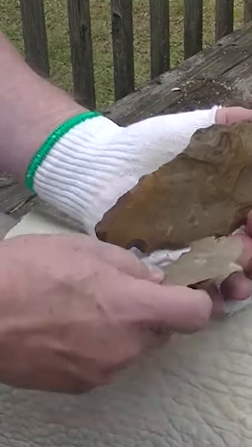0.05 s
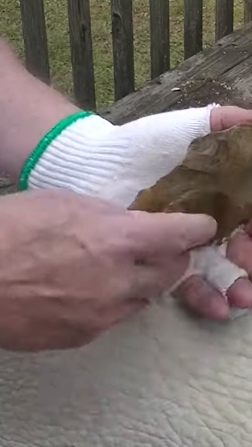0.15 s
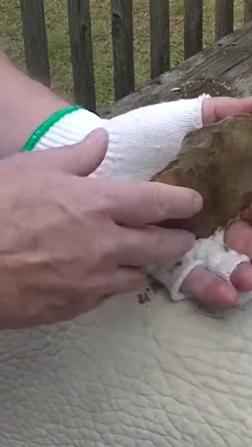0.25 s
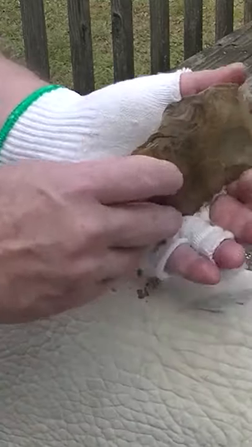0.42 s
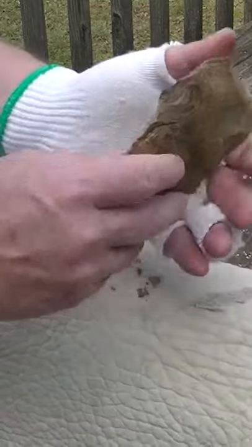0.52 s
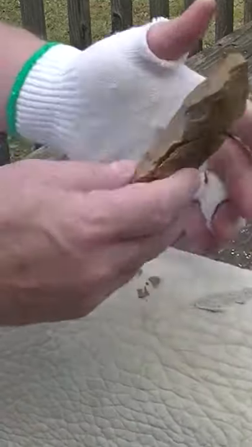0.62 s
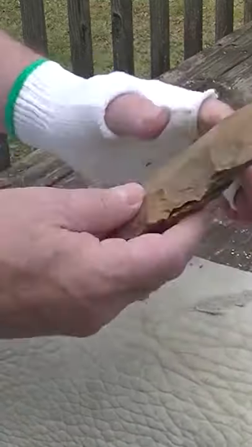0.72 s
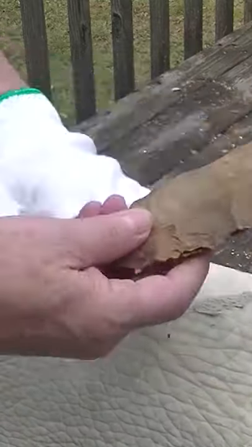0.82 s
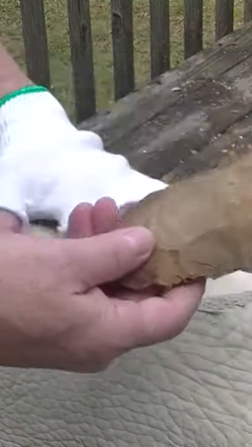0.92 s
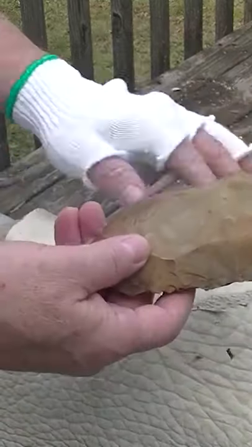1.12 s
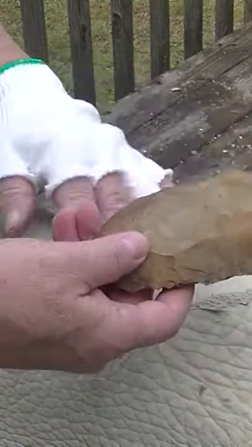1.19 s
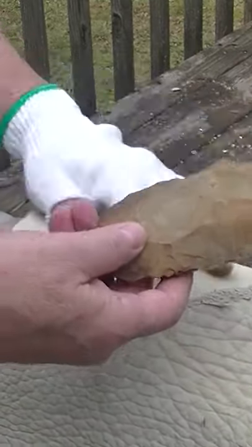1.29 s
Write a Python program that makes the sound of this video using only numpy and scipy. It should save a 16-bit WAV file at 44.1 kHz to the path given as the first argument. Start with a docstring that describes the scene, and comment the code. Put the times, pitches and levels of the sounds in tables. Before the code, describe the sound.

A thin flint flake clinks against a larger stone from about 0.2 seconds, close up: a quick cluster of sharp, ringing clicks with a gritty scrape, loudest near 0.3 and fading by 0.6. From 0.9 to 1.2 seconds fingers and a cotton glove softly rub the stone, and a small chip tinks near 1.25. Quiet garden air continues throughout, with a thin, distant bird call around 0.9.

```python
"""Flint on stone in a garden

Close to a stereo pair of microphones, outdoors, a thin flint flake is knocked against a larger stone
and dragged over it: each contact clicks and sets the flake ringing. Fingers and a cotton glove then rub
over the stone as it is turned, and a small chip tinks. Deck boards and a fence answer faintly.
Far off, birds call thinly over quiet garden air."""
import sys
import numpy as np
from scipy import signal
from scipy.fft import rfft, irfft, next_fast_len
from scipy.io import wavfile
from scipy.ndimage import uniform_filter1d, minimum_filter1d, map_coordinates

SR = 44100
rng = np.random.default_rng(int(sys.argv[2]) if len(sys.argv) > 2 else 0)


def dump(signal):
    """Clip the signal to [-1, 1] and save it as 16-bit WAV at the path in sys.argv[1]."""
    limited = np.clip(np.atleast_2d(signal).T, -1, 1)
    pcm = np.round(limited * 32767).astype(np.int16)
    wavfile.write(sys.argv[1], SR, pcm)


N = 59535

# the flake's modes: (frequency [Hz], level [dB], t60 [s], left minus right [dB])
FLAKE_MODES = [(4863, -12.5, .08, 2), (8125, -8, 0.081, 4.5), (9016, 1, 0.046, -6.5),
               (10920, -20.5, 0.046, 8), (12570, -28, .05, 15), (13400, -15.5, .055, -0.5)]


def flake_knocks():
    """Each knock clicks and rings the flake; hard ones have a sharp edge. Gives (clicks, rings + edges)."""
    # stone contacts, mostly the flake meeting the stone; the last, at 1.278 s, is the small chip bouncing once
    # more: (time [s], click [dB], pitch [Hz], width [cycles], ring [dB], sharp edge [dB])
    knocks = [(.2371, -4, 2640, 0.27, -20.5, -12), (.25, -26, 2440, 0.55, -42, -55),
              (0.2555, -16, 2670, 0.42, -46, -55), (.258, -15.5, 2650, 0.34, -34, -52),
              (0.275, -20, 2720, 0.39, -33.5, -53), (0.2823, -25.5, 2740, 0.53, -59, -60),
              (.2865, -25, 2430, 0.39, -28.5, -29), (0.3026, -23.5, 2890, 0.61, -35.5, -55),
              (0.3142, 3.5, 4720, 0.97, -13, -6.5), (.3148, -5.5, 2504, .6, -28.5, -36),
              (0.3298, -12, 3850, 0.34, -32, -40), (.357, -2.5, 3450, 0.41, -25, -18),
              (0.3695, -16.5, 2970, 1.15, -44, -50), (0.3768, -18.5, 3460, 0.41, -52, -55),
              (0.3904, -15.5, 3020, 0.9, -42, -45), (.4065, -13, 3550, 0.4, -33, -35),
              (0.4083, -7.5, 3880, 0.36, -36, -26), (.412, -6, 3156, 1.1, -51, -28),
              (.456, -23, 2920, 0.61, -64, -70), (0.4671, -29.5, 2750, 0.51, -55, -65),
              (0.5189, -25.5, 2530, 0.45, -70, -75), (0.5579, -27.5, 2670, 0.23, -70, -50),
              (0.984, -26, 3320, 1.7, -70, -70), (1.278, -35, 3000, 0.46, -75, -65)]
    # spectrum of the sharp edge: (frequency [Hz], gain [dB])
    edge_colour = [(60, -18), (500, -4.5), (1400, -13.5), (6000, -3), (9000, 4.5), (13500, -1.5),
                   (16000, -8)]
    edge_decay_s, nudge_s = 0.00018, 0.9845
    clicks, edges, rings = np.zeros(N), np.zeros(N), np.zeros((2, N))
    t = np.arange(SR // 200) / SR
    for s, db, hz, cycles, ring_db, edge_db in knocks:
        add(clicks, s, amp(db) * click(hz, cycles))
        add(edges, s, amp(edge_db) * rng.standard_normal(len(t)) * np.exp(-t / edge_decay_s))
        add(rings, s, amp(ring_db) * ring(FLAKE_MODES, shimmer=0.21))
    # a soft push rings only the lowest mode
    add(rings, nudge_s, amp(-23.5) * ring(FLAKE_MODES[:1], shimmer=0.12))
    return clicks, rings + coloured(edges, edge_colour)


def flake_drag():
    """The edge sticks and slips, crushing grit and keeping the modes singing. Gives (slips, rings + rasp)."""
    # the stroke: (time [s], level [dB], slip pitch [Hz], lowest mode [dB], upper modes [dB])
    stroke = [(.236, -53, 2550, -80, -70), (.239, -32.5, 2530, -54, -41), (.262, -33.5, 2530, -58, -41),
              (.29, -49.5, 2540, -60, -50), (.312, -53, 2920, -52, -62), (.318, -26.5, 3330, -52, -39),
              (.34, -29, 3640, -31.5, -36), (.354, -34, 3100, -31.5, -47), (.38, -28, 3300, -31.5, -47.5),
              (.408, -26, 2970, -31.5, -40.5), (.42, -34, 3130, -41, -68), (.45, -57, 2900, -64, -75),
              (.463, -41, 2560, -66, -70), (.49, -66, 2540, -90, -88), (.56, -49, 2550, -88, -82),
              (.6, -66.5, 2600, -100, -100)]
    # spectrum of crushed grit: (frequency [Hz], gain [dB])
    rasp_colour = [(2500, -35), (6000, -6), (7400, -3), (8400, -14), (9500, 2), (10500, -3), (12000, -9),
                   (13400, -3), (15000, -26)]
    slips_per_s = 700
    level_db, pitch_hz, lowest_db, upper_db = curves(stroke)
    slips, rings = np.zeros(N), np.zeros((2, N))
    t = np.arange(N) / SR
    touching = (t > stroke[0][0]) & (t < stroke[-1][0])
    for k, (hz, db, t60, side_db) in enumerate(FLAKE_MODES):
        steady, mode_db = (4.5, lowest_db) if k == 0 else (1, upper_db + db)
        sway = steady + wobble(9 / t60) + 1j * wobble(9 / t60) + 1.02 * rattle(N)
        rings += amp(mode_db) * unit(mode_at_mics(sway * np.exp(2j * np.pi * hz * t), side_db))
    for k, (late, size, tune, push) in enumerate(rng.standard_normal((N // 30, 4))):
        s = abs(k + late / 2) / slips_per_s
        if s * SR < N - 1:
            hz = pitch_hz[int(s * SR)] * np.exp(0.15 * np.clip(tune, -2, 1))
            add(slips, s, np.sign(push) * amp(2 * min(size, 1)) * click(hz, cycles=0.57))
    rasp = amp(level_db - 16.5) * unit(coloured(slips * rng.standard_normal((2, N)), rasp_colour))
    return touching * amp(level_db) * unit(slips), touching * (rings + rasp)


def click(hz, cycles):
    """The pulse of one stone contact: a few swings under an envelope of peak 1."""
    t = np.arange(SR // 200) / SR
    rise = t * hz / cycles / 2
    return (rise * np.exp(1 - rise)) ** 2 * np.sin(2 * np.pi * hz * t)


def ring(modes, shimmer):
    """Free ringing of a struck piece, a little different at every blow."""
    t = np.arange(SR // 4) / SR
    attack = 1 - np.exp(-t / 0.00024)
    out = np.zeros((2, len(t)))
    for hz, db, t60, side_db in modes:
        envelope = attack * amp(db + rng.normal() - 60 * t / t60)
        mode = (1 + shimmer * rattle(len(t))) * np.exp(2j * np.pi * (hz * t + rng.random()))
        out += envelope * mode_at_mics(mode, side_db)
    return out


def rattle(count, swings_per_s=700):
    """The pressed stone rattles: quick random swings in the size and phase of a mode."""
    position = np.arange(count) * swings_per_s / SR
    knots = rng.standard_normal((2, N // 8))
    real, imag = [map_coordinates(row, [position], mode="wrap") for row in knots]
    return real + 1j * imag


def mode_at_mics(mode, side_db, apart_turns=0.1):
    """A mode reaches each microphone with its own level and phase."""
    return pan(side_db) * np.real(mode * np.exp(1j * np.pi * apart_turns * np.array([[1], [-1]])))


def contacts_at_mics(pulses):
    """Stone contacts, coloured, reach the microphones with a balance that depends on frequency."""
    # spectrum of stone on stone: (frequency [Hz], gain [dB])
    contact_colour = [(40, -27), (300, -10.5), (1150, -7), (1750, 0.5), (3300, -1.5), (4700, 0),
                      (6500, -0.5), (10000, 8), (14000, -22), (16000, -20)]
    # place in the stereo image: (frequency [Hz], left minus right [dB])
    balance = [(1000, -1), (2200, 0.5), (3200, -4.5), (4500, 1), (7000, -4), (9500, -5), (13000, 1)]
    hz, side_db = np.transpose(balance)
    gains = pan(1) ** np.interp(np.fft.rfftfreq(N, 1 / SR), hz, side_db)
    phase_shift = 1 + 1j * amp(-18.5) * np.array([[1], [-1]])
    return irfft(rfft(coloured(pulses, contact_colour)) * gains * phase_shift, N)


def chip():
    """A small chip lands and bounces with a crisp splash and a high, short ring."""
    # the landings: (time [s], level [dB])
    landings = [(1.2558, -27.5), (1.2583, -34), (1.2638, -39.5)]
    # the chip's modes: (frequency [Hz], level [dB], t60 [s], left minus right [dB])
    chip_modes = [(4660, 1, 0.027, -1), (5000, -5.5, .04, 3), (5280, -12, 0.054, 0), (7035, -6.5, 0.043, 3),
                  (8400, -16.5, 0.021, 12), (10980, -6.5, 0.034, -7.5), (12385, -6.5, 0.04, -8)]
    out = amp(-7) * grit(landings, decay_s=0.0045)
    for s, db in landings:
        add(out, s, amp(db) * ring(chip_modes, shimmer=0.33))
        add(out, s, amp(db - 1) * click(hz=4760, cycles=1))
    return out


def crumbs():
    """Crumbs of grit drop as the drag ends."""
    # the drops: (time [s], level [dB])
    drops = [(.5465, -47), (.5605, -40.5), (.622, -50.5)]
    return grit(drops, decay_s=0.0023)


def grit(hits, decay_s):
    """Grit ticks in short, bright bursts of noise."""
    # spectrum of a tick: (frequency [Hz], gain [dB])
    tick_colour = [(3000, -29), (7000, -8), (10000, 0), (13700, 0), (15500, -6)]
    out, t = np.zeros((2, N)), np.arange(SR // 20) / SR
    for s, db in hits:
        burst = rng.standard_normal((2, len(t)))
        add(out, s, amp(db) * (burst / 2 + burst.mean(0)) * np.exp(-t / decay_s))
    return coloured(out, tick_colour)


def fingers():
    """Skin rubs over the stone as it is turned."""
    # the strokes: (time [s], level [dB])
    strokes = [(.82, -80), (.88, -51.5), (.94, -64.5), (.975, -40.5), (1.012, -53), (1.036, -43.5),
               (1.08, -47.5), (1.108, -38.5), (1.165, -63.5), (1.331, -67.5), (1.338, -45.5)]
    # spectrum of skin on stone: (frequency [Hz], gain [dB])
    skin_colour = [(800, -38), (1700, -9.5), (2400, 1), (3400, -1.5), (4300, -10), (6500, -16.5),
                   (10000, -26), (15000, -32)]
    return rub(strokes, skin_colour)


def glove():
    """Cotton brushes the stone with a dry hiss."""
    # the strokes: (time [s], level [dB])
    strokes = [(.93, -78), (.975, -73), (1.01, -60), (1.04, -56.5), (1.068, -46), (1.085, -58), (1.12, -55),
               (1.17, -82)]
    # spectrum of cotton on stone: (frequency [Hz], gain [dB])
    cotton_colour = [(1500, -20), (4200, 8.5), (6500, 0.5), (10000, -5), (15000, -15)]
    return rub(strokes, cotton_colour)


def rub(strokes, colour, grain_db=3):
    """Skin or cotton catches on the rough stone in dense grains."""
    level_db, = curves(strokes)
    noise = rng.standard_normal((2, N))
    grains = (noise + 3 * noise.mean(0)) * amp(grain_db * wobble(700))
    return amp(level_db) * unit(coloured(grains, colour))


def bird_call():
    """One thin rising call in the distance, smeared by the trees."""
    start_s, length_s, rise_s = 0.883, 0.041, 0.015
    start_hz, top_hz, waver_hz = 6250, 7600, 130
    t = np.maximum(np.arange(N) / SR - start_s, 0)
    hz = top_hz + (start_hz - top_hz) * np.exp(-t / rise_s) + waver_hz * wobble(600)
    envelope = np.sin(np.pi * np.minimum(t / length_s, 1) ** 0.5)
    call = amp(-42) * envelope * np.sin(2 * np.pi * np.cumsum(hz) / SR)
    return call + amp(-1.5) * echo(call, t60=0.38)


def bird_whistle(waver_hz=130):
    """A fainter bird, far off, glides up and fades."""
    # the glide: (time [s], pitch [Hz], level [dB])
    glide = [(0, 7300, -62), (.05, 7450, -71), (.08, 7650, -76), (.14, 8000, -69), (.2, 8300, -81),
             (.25, 8300, -120)]
    hz, db = curves(glide)
    return amp(db) * np.sin(2 * np.pi * np.cumsum(hz + waver_hz * wobble(600)) / SR)


def garden_air():
    """Quiet outdoor background, nearly the same at both microphones."""
    # spectrum of the air: (frequency [Hz], gain [dB])
    air_colour = [(15, -40), (25, -30), (64, -5.5), (123, -11), (161, -1.5), (373, -3.5), (405, -2.5),
                  (503, -6.5), (1070, -7), (1160, -7), (3250, -14.5), (4140, -25.5), (4740, -22),
                  (7920, -27), (16000, -35)]
    # its slow drift: (time [s], level [dB])
    drift = [(0, -49.5), (.2, -50.5), (.75, -49.5), (1.35, -49)]
    # its stereo width: (frequency [Hz], side gain [dB])
    width = [(50, -17.5), (1000, -20), (4000, -13), (12000, -8)]
    level_db, = curves(drift)
    mid, side = unit(coloured(rng.standard_normal((2, N)), air_colour))
    side = coloured(side, width)
    return pan(0.76) * amp(level_db + 0.67 * wobble(10.9)) * np.array([mid + side, mid - side])


def echo(x, t60):
    """Diffuse reflections: x through a stereo noise tail of about unit energy."""
    t = np.arange(SR // 2) / SR
    tail = rng.standard_normal((2, len(t))) * amp(-60 * t / t60) * (1 - np.exp(-t / 0.0027))
    tail = tail + tail.mean(0)
    return signal.fftconvolve(np.atleast_2d(x), tail / np.linalg.norm(tail[0]), axes=1)[:, :N]


def amp(db):
    """Decibels to gain."""
    return 10 ** (np.asarray(db) / 20)


def unit(x):
    """Scale to rms 1."""
    return x / np.sqrt(np.mean(x ** 2) + 1e-20)


def curves(rows):
    """One value per sample for each column after the time."""
    times, *columns = np.transpose(rows)
    return [np.interp(np.arange(N) / SR, times, column) for column in columns]


def wobble(rate):
    """A smooth random curve, rate knots a second."""
    return map_coordinates(rng.standard_normal(N // 4), [np.arange(N) * rate / SR], mode="wrap")


def pan(db):
    """Left and right gains for a level difference."""
    return amp(np.array([[db], [-db]]) / 2)


def add(out, s, sound):
    """Mix a sound in from time s."""
    i = round(s * SR)
    out[..., i:i + sound.shape[-1]] += sound[..., :N - i]


def coloured(x, points):
    """x through a causal filter with the given (frequency [Hz], gain [dB]) points."""
    size = 2 * next_fast_len(N)
    hz, db = np.transpose(points)
    gain_db = np.interp(np.log(np.fft.rfftfreq(size, 1 / SR) + 1), np.log(hz), db)
    cepstrum = irfft(np.log(amp(gain_db)))
    cepstrum[1:size // 2] *= 2  # fold to minimum phase
    cepstrum[size // 2 + 1:] = 0
    return irfft(rfft(x, size) * np.exp(rfft(cepstrum)))[..., :N]


def scene():
    """The stones close to the microphones, a faint answer from deck and fence, the garden behind."""
    clicks, rings = flake_knocks()
    slips, singing = flake_drag()
    stones = contacts_at_mics(clicks + slips) + rings + singing + chip() + crumbs()
    near = stones + fingers() + glove()
    deck_and_fence = amp(-17.5) * echo(near, t60=0.2)
    return near + deck_and_fence + bird_call() + bird_whistle() + garden_air()


def record(dry):
    """The recorder: a fast limiter holds peaks above full scale, then a steep low-pass cuts the top."""
    limiter_s, top_hz = 0.0007, 15900
    size, window = 2 * next_fast_len(N), round(limiter_s * SR)
    needed = 1 / np.maximum(np.abs(dry).max(0), 1)
    gain = uniform_filter1d(minimum_filter1d(needed, window), window)
    low_pass = 1 / np.sqrt(1 + (np.fft.rfftfreq(size, 1 / SR) / top_hz) ** 140)
    return irfft(rfft(dry * gain, size) * low_pass)[:, :N]


dry = scene()
out = record(dry)
dump(out)
```